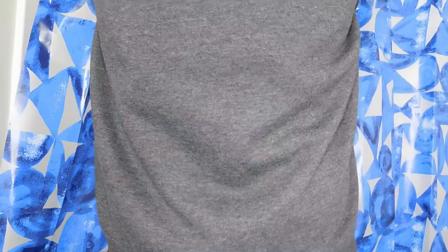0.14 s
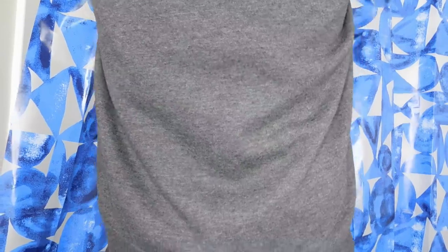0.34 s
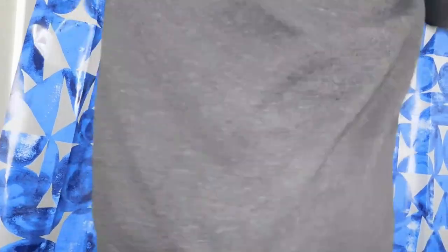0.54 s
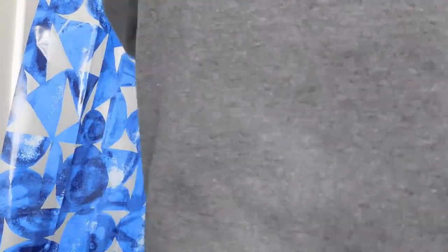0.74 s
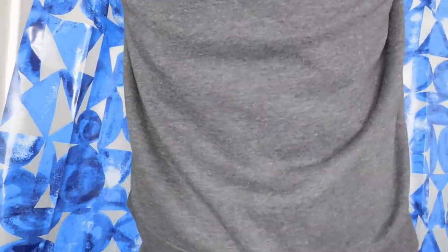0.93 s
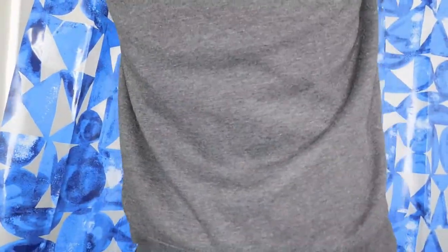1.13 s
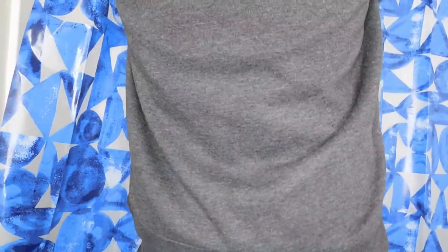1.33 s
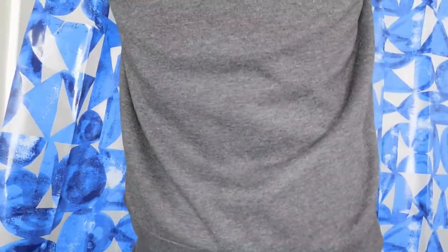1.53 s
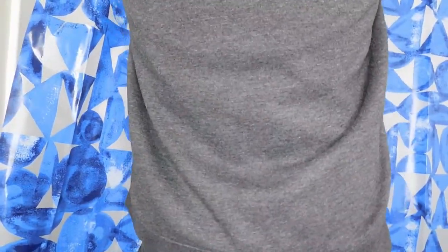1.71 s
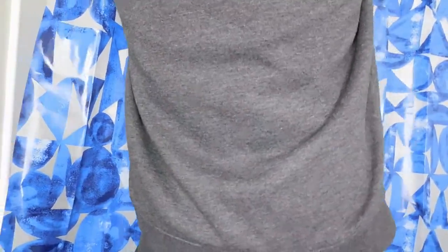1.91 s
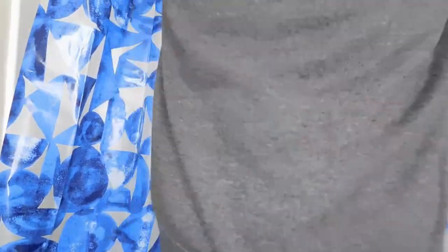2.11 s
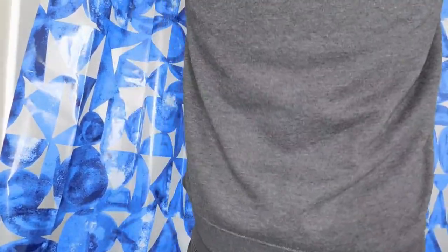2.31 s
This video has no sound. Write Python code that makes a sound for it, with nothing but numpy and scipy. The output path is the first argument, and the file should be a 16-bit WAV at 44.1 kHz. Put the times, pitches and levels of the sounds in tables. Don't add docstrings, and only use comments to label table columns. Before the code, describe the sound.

Close stereo microphones catch thin plastic sheeting crackling and scraping, a sharp clack early, bright snaps around one second, sparser crinkles, then a ring slipping and knocking the rod, with soft hiss and a short tiled tail.

```python
import sys
import numpy as np
from scipy import signal
from scipy.fft import rfft, irfft, next_fast_len
from scipy.io import wavfile
from scipy.ndimage import map_coordinates

SR = 44100
rng = np.random.default_rng(int(sys.argv[2]) if len(sys.argv) > 2 else 0)


def gain_from_db(level_db):
    decades = np.asarray(level_db, float) / 20
    return 10 ** decades


def digitize_waveform(pressure):
    field = np.atleast_2d(pressure).T
    bounded = np.clip(field, -1, 1)
    quanta = np.round(bounded * 32767).astype(np.int16)
    wavfile.write(sys.argv[1], SR, quanta)


N = 103635


def unit(x):
    return x / np.sqrt(np.mean(x ** 2) + 1e-20)


def along(points, hz):
    point_hz, value = np.transpose(points)
    return np.interp(np.log(hz + 1), np.log(point_hz + 1), value)


def curve(rows):
    s, value = np.transpose(rows)
    return np.interp(np.arange(N) / SR, s, value)


def wobble(knots_per_s):
    return map_coordinates(rng.standard_normal(N), [np.arange(N) * knots_per_s / SR])


def filtered(x, response):
    n = x.shape[-1]
    size = next_fast_len(n + 2048)
    spectrum = rfft(x, size) * response(np.fft.rfftfreq(size, 1 / SR))
    return irfft(spectrum, size)[..., :n]


# frequency in Hz, density in dB per Hz.
HISS_COLOUR = [(15, -43), (25, -18.5), (110, -7), (320, -7), (1100, -6.5), (3000, -4.5), (8000, -7),
               (16000, -15.5)]


def hiss():
    noise = rng.standard_normal((2, N))
    return gain_from_db(-52.5) * unit(filtered(noise, lambda hz: gain_from_db(along(HISS_COLOUR, hz))))


def bathroom(x):
    t60_s, first_echo_s = 0.24, 0.003
    t = np.arange(SR // 4) / SR
    tail = rng.standard_normal((2, len(t))) * gain_from_db(-60 * t / t60_s) * (t > first_echo_s)
    return signal.fftconvolve(x, tail / np.linalg.norm(tail[0]), axes=1)[:, :N]


# frequency in Hz, density in dB per Hz.
AIR_COLOUR = [(20, -13), (50, -16), (100, 1), (170, -6.5), (600, -120)]
# start in seconds, peak in dB, pitch in Hz.
PUFFS = [(0.441, -55, 120), (0.453, -54.5, 120), (0.534, -52.5, 106), (0.573, -65, 86.1),
         (0.608, -62, 88.8), (0.649, -70, 102), (0.919, -65, 90), (1.028, -65, 88), (1.469, -62, 100),
         (1.548, -66, 96), (1.619, -73, 140), (1.79, -66, 92), (1.887, -59, 107), (1.929, -54.5, 107),
         (1.999, -58, 86.1), (2.189, -66, 113)]


def sway():
    rise_s, t60_s = 0.0067, 0.14
    out = np.zeros((2, N + SR))
    t = np.arange(SR // 4) / SR
    for s, db, hz in PUFFS:
        phase = rng.choice([-1, 1]) * rng.uniform(0.36, 0.98) * np.array([[1], [-1]])
        cycle = 2 * np.pi * hz * t
        puff = np.sin(cycle + phase)
        puff += 0.3 * np.sin(0.34 * cycle + phase)
        puff += 0.35 * np.sin(1.64 * cycle - phase)
        envelope = gain_from_db(db + 5.5 - 60 * t / t60_s) * (1 - np.exp(-(t / rise_s) ** 2))
        start = round(s * SR)
        out[:, start:start + len(t)] += envelope * puff
    rumble = filtered(rng.standard_normal((2, N)), lambda hz: gain_from_db(along(AIR_COLOUR, hz)))
    return out[:, :N] + gain_from_db(-78) * unit(rumble)


# frequency in Hz, level in dB, t60 in seconds.
RING_MODES = [(670, -10.5, 0.019), (1080, 0.5, 0.018), (1340, -2.5, 0.014), (1890, -6, 0.012),
              (2630, 0, .012), (3900, 1, .007)]
# start in seconds, peak in dB.
KNOCKS = [
    (1.933, -29),
    (1.987, -44),
]


def rings():
    rise_s, level_spread_db, pitch_spread = 0.00043, 2.0, 0.021
    out = np.zeros(N + SR)
    t = np.arange(SR // 20) / SR
    for s, db in KNOCKS:
        knock = np.zeros(len(t))
        for hz, mode_db, t60_s in RING_MODES:
            mode_db = mode_db + level_spread_db * rng.standard_normal()
            hz = hz * (1 + pitch_spread * rng.standard_normal())
            knock += gain_from_db(mode_db - 60 * t / t60_s) * np.sin(2 * np.pi * hz * t)
        start = round(s * SR)
        out[start:start + len(t)] += gain_from_db(db - 2.5) * (1 - np.exp(-t / rise_s)) * knock
    return out[:N] * np.ones((2, 1))


# frequency in Hz, likeness from 0 to 1.
ALIKE = [(100, .2), (1400, 0.56), (3100, 0.17), (6800, 0.57), (15000, 0.019)]


def spread(pair, gain):
    def mid_side_gain(hz):
        turn = np.arccos(np.clip(along(ALIKE, hz), -1, 1)) / 2
        return gain(hz) * np.array([np.cos(turn), np.sin(turn)])

    mid, side = filtered(pair, mid_side_gain)
    return np.array([mid + side, mid - side])


def crackle(smooth):
    hits_per_s, hit_db, decay_s = 700, 2, 0.00037
    happens, size = rng.random((2, N))
    hits = (happens < hits_per_s / SR) * gain_from_db(-hit_db * np.log(size + 0.054))
    flicker = signal.lfilter([1], [1, -np.exp(-1 / (decay_s * SR))], hits)
    return (smooth + flicker) * rng.standard_normal((2, N))


# frequency in Hz, density in dB per Hz.
SHEET = [(180, -48), (300, -20), (555, -16), (1480, -10), (1750, -11), (2030, -6), (4020, -2.5),
         (10700, -4.5), (16000, -10.5)]


def sheet_colour(hz, extra_db=0):
    return gain_from_db(along(SHEET, hz) + extra_db)


def top_share(hz, top_db):
    return top_db / (1 + (8500 / (hz + 1)) ** 4)


def bright_band(centre_hz, top_db):
    def gain(hz):
        octaves = np.log2((hz + 1) / centre_hz)
        return sheet_colour(hz, 4.5 * np.exp(-(octaves / 0.48) ** 2) + top_share(hz, top_db))
    return gain


def full_body(body_db, top_db):
    return lambda hz: sheet_colour(hz, body_db / (1 + (hz / 1900) ** 3) + top_share(hz, top_db))


# time in seconds, rustle in dB.
HANDLING = [(0, -59.5), (.15, -58), (.3, -53), (.5, -53), (.64, -55), (.76, -62), (.92, -48.5), (1.1, -53),
            (1.45, -56.5), (1.9, -54.5), (2.13, -58), (2.35, -57)]


def rustle():
    level_db = curve(HANDLING) - 4
    level_db = level_db + 2.9 * wobble(29.63) + 3.2 * wobble(100)
    return gain_from_db(level_db) * unit(spread(crackle(0.87), sheet_colour))


# start in seconds, length in seconds, level in dB, centre in Hz.
DRAGS = [(.0, 0.041, -54, 4600), (0.335, 0.016, -49, 5030), (0.408, 0.017, -38, 5100),
         (0.433, 0.02, -50, 5000), (0.441, 0.013, -44.5, 5530), (0.459, .004, -39, 6100),
         (0.524, 0.051, -47.5, 5000), (0.57, 0.023, -40.5, 3960), (0.594, 0.026, -44.5, 3900),
         (.868, 0.013, -47.5, 6000), (.959, 0.025, -43.5, 5440), (1.022, .007, -45.5, 9000),
         (1.527, 0.016, -55, 5550), (1.742, .025, -52, 6170), (1.788, .07, -52.5, 4400),
         (1.864, 0.044, -50, 5130), (1.984, 0.039, -48.5, 5070), (2.027, 0.046, -45.5, 5130),
         (2.2, 0.027, -52.5, 4530)]


def drags():
    edge_s = 0.0021
    t = np.arange(N) / SR
    grit = crackle(1.0)
    out = np.zeros((2, N))
    for s, length_s, db, hz in DRAGS:
        first = max(round((s - 5 * edge_s) * SR), 0)
        span = slice(first, round((s + length_s + 9 * edge_s) * SR))
        inside_s = np.minimum(2 * (t[span] - s), s + length_s - t[span])
        hold = np.exp(np.minimum(0, inside_s) / edge_s)
        out[:, span] += gain_from_db(db) * hold * unit(spread(grit[:, span], bright_band(hz, 0)))
    return out


def snap(db, colour, rise_ms, creep_ms, creep_db, shiver_ms, crack_db):
    ms = (np.arange(1764) - 500) / SR * 1000
    creep = gain_from_db(creep_db) * np.exp(-(ms / creep_ms) ** 2 / 2)
    before = np.maximum(np.exp(ms / rise_ms), creep)
    shape = np.where(ms < 0, before, np.exp(-np.abs(ms) / shiver_ms))
    noise = rng.standard_normal((3, len(ms)))
    spikes = gain_from_db(3 * noise[2])
    shiver = noise[:2] * spikes * shape
    crack = gain_from_db(crack_db + 0.32 * (db + 35))
    shiver[:, np.argmax(shape)] = crack * np.array([1.4, 0.5])
    burst = spread(shiver, colour)
    return gain_from_db(db - 7) * burst * np.linalg.norm(shiver) / np.linalg.norm(burst)


# start in seconds, peak in dB, extra body in dB, extra top in dB.
CLACKS = [
    (.4928, -23.5, 11.5, 3.5),
    (.5257, -12, 2, 1.5),
    (.538, -36, 11, -6),
    (.612, -36, 16, -3),
    (1.8956, -29, 10, -1),
    (1.9018, -33, 10, 0),
]
# start in seconds, peak in dB, centre in Hz, top share
# in dB.
FURTHER_SNAPS = [
    (0.4573, -23, 4350, -21),
    (.9522, -31, 5900, -19),
    (.958, -30, 6100, -19),
    (0.9754, -19.5, 8300, -18),
    (.9762, -20, 4700, -18.5),
    (1.6033, -28.5, 7460, -11),
]
# start in seconds, peak in dB, centre in Hz, top share in dB.
EARLY_SNAPS = [(0.0191, -29.5, 4690, -24), (0.0374, -38, 3290, -24), (0.1107, -36, 5410, -27),
               (0.193, -33.5, 4300, -11), (0.2041, -28.5, 2650, -22.5), (0.2241, -28.5, 4830, -12),
               (0.266, -32.5, 3120, -11), (0.2798, -30, 2500, -16), (0.2934, -38, 4240, -14),
               (0.3121, -27.5, 4490, -9.5), (0.3716, -32.5, 4970, -16), (0.391, -32.5, 7790, -19),
               (0.407, -24.5, 3980, -21), (0.5755, -24.5, 3170, -24), (0.5837, -34, 3170, -17),
               (0.6344, -37, 5510, -14), (0.8726, -31.5, 6590, -29), (0.9185, -27, 8470, -21),
               (1.0245, -30, 6400, -4)]
# start in seconds, peak in dB, centre in Hz, top share in dB.
MIDDLE_SNAPS = [(1.069, -43, 3170, -20), (1.1857, -37, 6550, -18), (1.2174, -31, 4100, -22),
                (1.2654, -30.5, 5170, -21), (1.3233, -34.5, 2970, -16), (1.3292, -28.5, 6700, -12),
                (1.3563, -33.5, 6690, -15), (1.379, -29.5, 7700, -15.5), (1.4097, -34.5, 5230, -16),
                (1.4415, -35.5, 6880, -24), (1.4592, -27, 5960, -18), (1.4643, -30, 7560, -18),
                (1.47, -33.5, 9000, -20), (1.48, -36, 7310, -26), (1.5625, -33, 4080, -18),
                (1.6374, -37.5, 6330, -16), (1.676, -30.5, 6600, -13), (1.715, -35, 4150, -19)]
# start in seconds, peak in dB, centre in Hz, top share in dB.
LATE_SNAPS = [(1.8114, -39, 2530, -20), (1.8731, -37, 7110, -19), (1.932, -25.5, 4000, -17),
              (1.9869, -31, 6200, -12), (2.0112, -36, 3260, -22), (2.0614, -23, 6600, -17.5),
              (2.076, -35, 4020, -15), (2.2181, -35.5, 4640, -22), (2.2516, -38.5, 2730, -19),
              (2.2947, -39, 3860, -22), (2.3138, -37.5, 5950, -27), (2.3444, -39, 5720, -21)]


def snaps():
    ring_slip = dict(rise_ms=0.36, creep_ms=2.5, creep_db=-6.5, shiver_ms=1.5, crack_db=5)
    crease = dict(rise_ms=0.46, creep_ms=2, creep_db=-9.5, shiver_ms=2.03, crack_db=-1.5)
    usual_top_db = -17.5
    bursts = []
    for s, db, body_db, top_db in CLACKS:
        bursts.append((s, snap(db, full_body(body_db, top_db), **ring_slip)))
    for table in (FURTHER_SNAPS, EARLY_SNAPS, MIDDLE_SNAPS, LATE_SNAPS):
        for s, db, hz, top_db in table:
            bursts.append((s, snap(db, bright_band(hz, top_db - usual_top_db), **crease)))
    out = np.zeros((2, N + SR))
    for s, burst in bursts:
        start = round(s * SR)
        out[:, start:start + burst.shape[1]] += burst
    return out[:, 441:N + 441]


def scene():
    lag_s, room_db = 1.8e-5, -20
    near = snaps() + rings()
    curtain = near + gain_from_db(room_db) * bathroom(near) + rustle() + drags()
    sides = np.array([[1], [-1]])
    return filtered(curtain, lambda hz: np.exp(-1j * np.pi * hz * lag_s * sides)) + sway()


def low_pass(x):
    return signal.sosfilt(signal.butter(12, 16530, fs=SR, output="sos"), x)


def record(dry):
    top_hz, edge_hz = 15800, 16500
    mix = filtered(dry + hiss(), lambda hz: np.where(hz < top_hz, 1, gain_from_db(-27)) * (hz < edge_hz))
    return low_pass(mix)


dry = scene()
out = record(dry)
digitize_waveform(out)
```